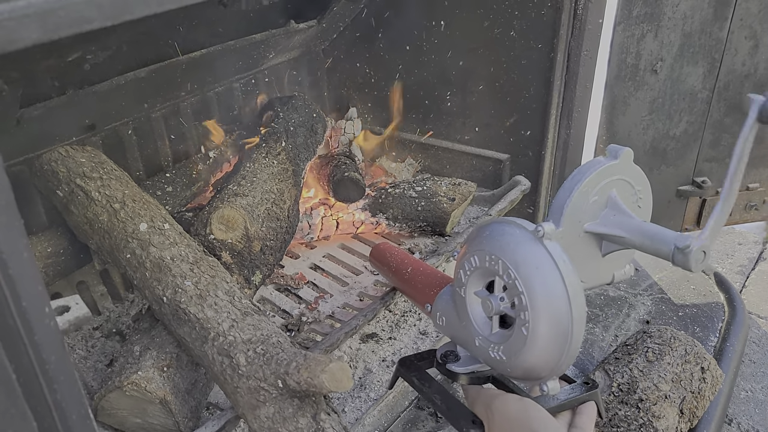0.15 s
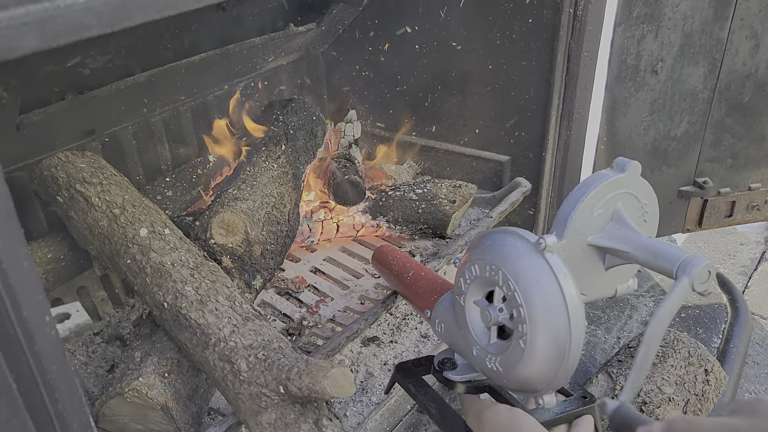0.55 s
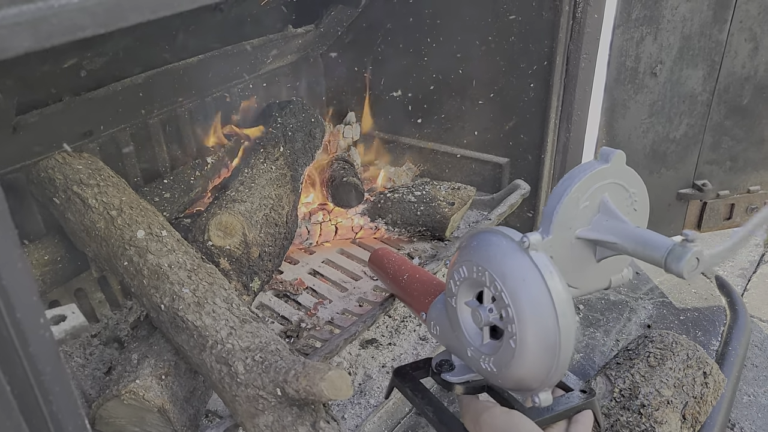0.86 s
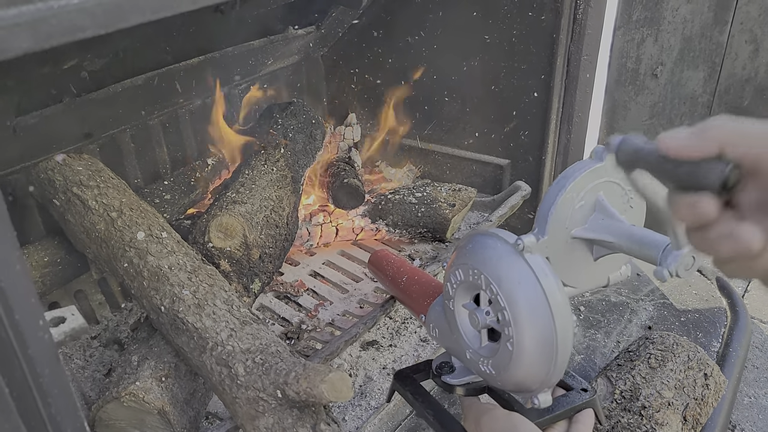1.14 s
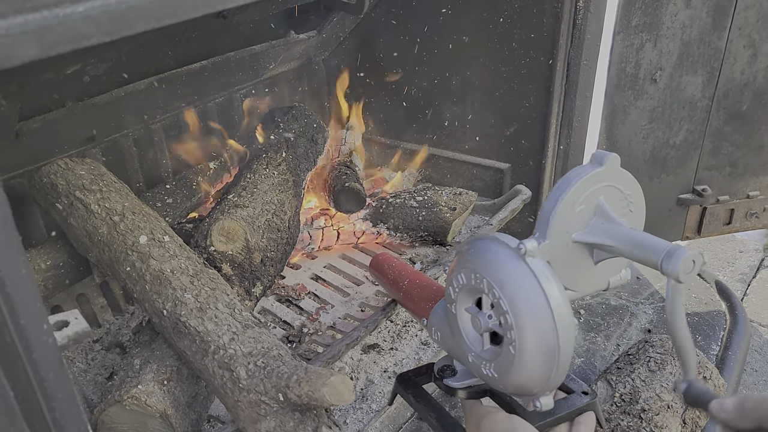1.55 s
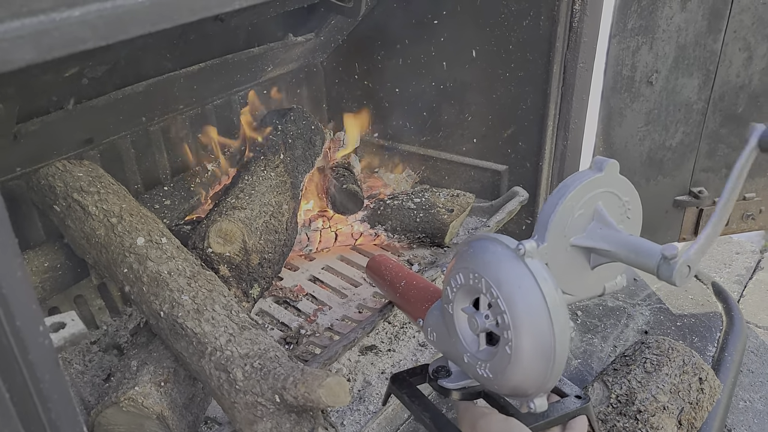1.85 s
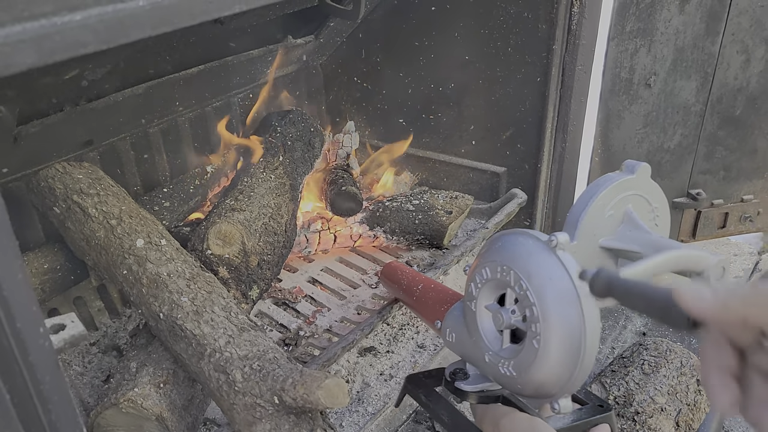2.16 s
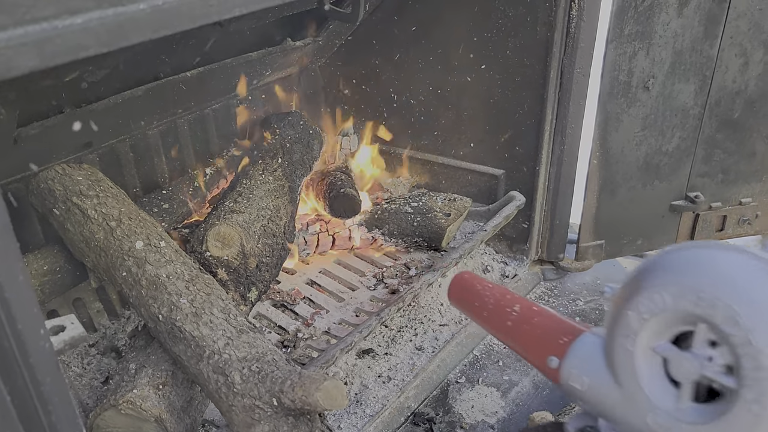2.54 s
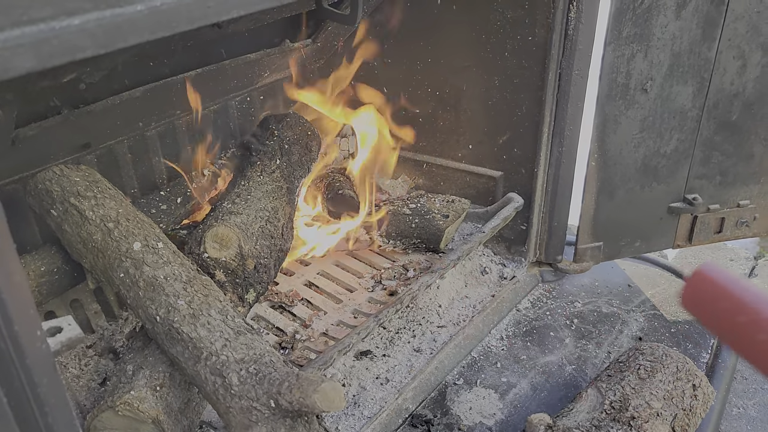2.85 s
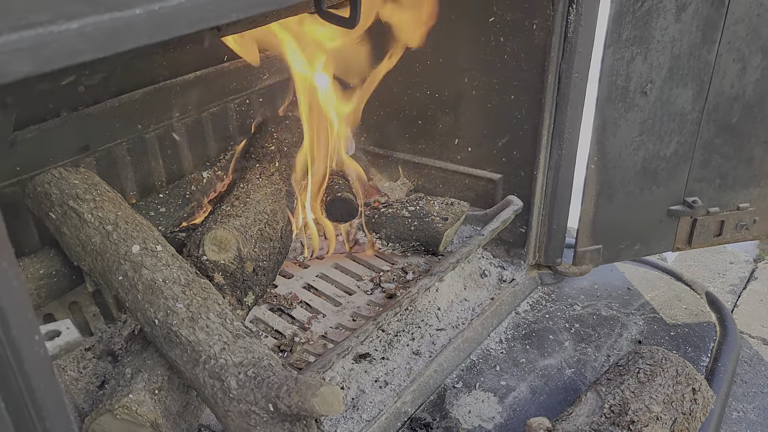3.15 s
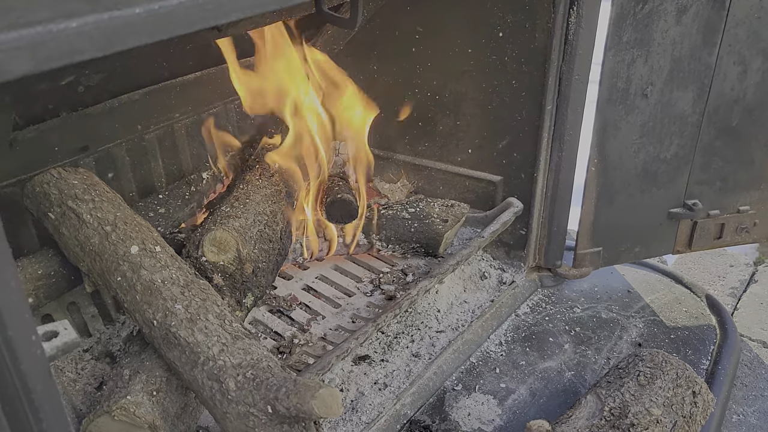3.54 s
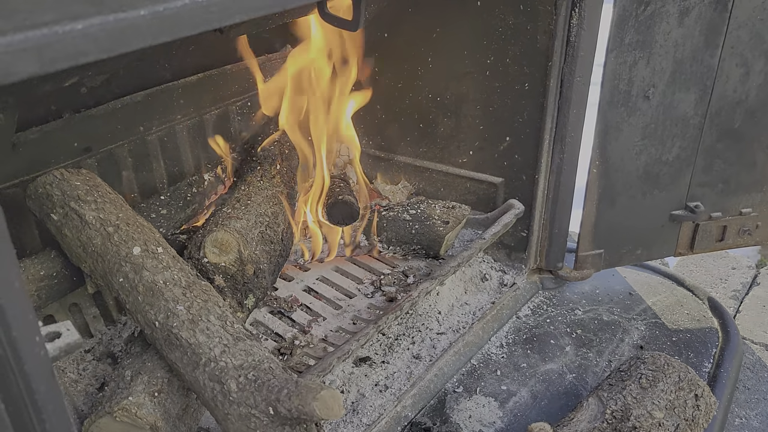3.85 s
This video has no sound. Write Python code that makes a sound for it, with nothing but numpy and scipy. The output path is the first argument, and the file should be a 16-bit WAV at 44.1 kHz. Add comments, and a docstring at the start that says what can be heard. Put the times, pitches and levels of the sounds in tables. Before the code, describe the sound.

A hand-cranked metal blower rattles from the start: quick, uneven knocks, ringing casing and gritty gear grinding, slightly to the right, over a deep fluttering fire roar and soft air hiss. Sharp bright clacks stand out around 2.2 s. From 2.3 s it is lifted away, thinner and weaker; the roar drops near 2.7 s, hiss briefly swells around 2.95 s. Rattling ends by 3.1 s, leaving faint low fire mutter and tiny ticks at 3.4 and 3.8 s.

```python
"""A fire roars under quick metal knocks and grinding, close to a two-port microphone.
A hand-cranked metal blower feeds a log fire in an iron firebox: its air jet makes the roar and a hiss,
its loose shaft knocks, with bright treble flares, and its gears grind through the casing.
The blower is lifted away to the right and runs down; the fire mutters on with a few ember ticks.
Air sounds are shaped noise; metal sounds are chattering clicks that ring casing modes and crack."""
import sys
import numpy as np
from scipy import signal
from scipy.fft import rfft, irfft
from scipy.io import wavfile
from scipy.ndimage import uniform_filter1d, map_coordinates

SR = 44100
rng = np.random.default_rng(int(sys.argv[2]) if len(sys.argv) > 2 else 0)


def convert_level_to_amplitude(level_db):
    """Map a level in decibels to its linear amplitude factor."""
    exponent = np.asarray(level_db, float) / 20
    return 10 ** exponent


def generate_wav(signal):
    """Clip the signal to [-1, 1] and save it as 16-bit WAV at the path in sys.argv[1]."""
    frames = np.transpose(np.atleast_2d(signal))
    scaled = np.clip(frames, -1, 1) * 32767
    pcm = np.round(scaled).astype(np.int16)
    wavfile.write(sys.argv[1], SR, pcm)


N = 176400  # samples, 4 s

# spectrum of the fire left alone, relative: pitch_hz, level_db (per Hz)
FIRE_SPECTRUM = [(25, -42), (60, -3.5), (92, 0.5), (154, -7.5), (200, -12.5), (270, -11.5), (430, -23),
                 (600, -31), (4400, -65), (6900, -69), (10000, -60), (15000, -42.5)]
# bass of the fire over time: time_s, level_db
FIRE_BASS = [(2.5, -33.5), (2.85, -51), (3.2, -47.5), (3.5, -50), (3.8, -45.5), (4, -49)]
FIRE_REST_DB = -65.5
# ticks of the embers: start_s, level_db (before the decay), pitch_hz
EMBER_TICKS = [(3.375, -43.5, 5900), (3.7913, -55, 5700), (3.8526, -49, 7040)]
TICK_DECAY_S, TICK_WIDTH_HZ = 0.005, 2600

# roar of the blown fire over time: time_s, level_db
ROAR_LEVEL = [(0, -26), (.3, -25.5), (.6, -26.5), (.9, -26), (1.2, -29), (1.45, -27), (1.7, -28.5),
              (1.95, -27.5), (2.3, -28.5), (2.5, -33.5), (2.6, -32.5), (2.68, -50), (2.85, -50), (3.2, -73)]
# spectrum of the roar, relative: pitch_hz, level_db (per Hz)
ROAR_SPECTRUM = [(25, -60), (55, -20), (90, -2), (126, 7.5), (160, -4), (185, -9), (215, 1.5), (280, -10),
                 (350, -2), (450, -11.5), (520, -13), (600, -22.5), (1200, -18), (3000, -77)]
# air hiss of the jet over time: time_s, level_db
JET_LEVEL = [(0, -50.5), (1.2, -53.5), (2.3, -50.5), (2.75, -44.5), (2.95, -42), (3.12, -45.5),
             (3.22, -51.5), (3.45, -56)]
# spectrum of the hiss, relative: pitch_hz, level_db (per Hz)
JET_SPECTRUM = [(500, -8), (2500, -9), (6000, -11), (7800, -12), (8600, -22.5), (11000, -9.5), (14000, -8)]
# left-right likeness of the air sounds: pitch_hz, likeness (1 = alike)
PORT_LIKENESS = [(60, .96), (250, 0.97), (600, 0.55), (1500, 0)]

# knocks of the loose shaft: peak_s, level_db (relative), low_share_db (extra below LOW_HZ)
SHAFT_KNOCKS = [(0.0712, -23, -0.5), (0.1058, -15.5, -6), (0.1343, -17, -4), (0.171, -11, -7),
                (0.2009, -16.5, -2), (0.2291, -15, -10), (.256, -21.5, -6.5), (0.2879, -25.5, -2),
                (0.3187, -21.5, -4.5), (0.3496, -21.5, -5), (0.3787, -13, -8), (0.408, -13, -10),
                (0.4404, -22, -1), (0.471, -23.5, 2), (0.5644, -30, 10), (0.5886, -26.5, 0.5),
                (0.6389, -23, -8), (0.7084, -28, -9), (0.7907, -18.5, -2), (0.823, -18, -2),
                (0.9164, -17.5, -6), (0.9517, -25, -1), (0.9719, -18, -4.5), (1.0211, -22, 0),
                (1.0515, -21, -7), (1.2461, -39, 16.5), (1.286, -16.5, -4.5), (1.3223, -37.5, 13.5),
                (1.4152, -27.5, 3.5), (1.4438, -29.5, 2), (1.5899, -55.5, 31), (1.6221, -22, 0),
                (1.6547, -42, 17), (1.686, -14.5, -3), (1.719, -27, 4), (1.7999, -31.5, 12.5),
                (1.8331, -18.5, -7), (1.8701, -16, -8), (1.9036, -13, -6.5), (1.9574, -20, -7),
                (1.9735, -31.5, 8.5), (2.0348, -20.5, -0.5), (2.0687, -21, -3), (2.1056, -23.5, -3),
                (2.174, -15.5, -10.5), (2.2119, -19, -22), (2.2677, -30, 4.5), (2.2997, -18.5, -7.5),
                (2.3129, -16, -16), (2.357, -29.5, 6.5), (2.3965, -27.5, -8), (2.4234, -29.5, -1),
                (2.4663, -51, -7), (2.5107, -21.5, -1.5), (2.5586, -22, -1), (2.61, -16.5, -5),
                (2.6584, -20, -1), (2.7127, -25, 6), (2.7639, -25, -0.5), (2.8275, -31, -2.5),
                (2.848, -42, 3), (2.8836, -38, 12), (2.9144, -33, -5), (2.9605, -46, 5.5),
                (2.9892, -44.5, -1), (3.0726, -54, 11)]
# modes of the casing: pitch_hz (middle), resting_level_db, lifted_level_db (relative), t60_s
CASING_MODES = [(655, -3.5, -39, 0.052), (770, -19, 6, 0.033), (1032.5, 1.5, -1, 0.045),
                (1286.5, 1.5, -0.5, 0.031), (1463.6, -6.5, 10.5, 0.043), (1655, -9, -1, 0.021),
                (2002, -7, 3, 0.024), (2197, -1.5, -6, 0.029), (2536, -4, -21.5, 0.03),
                (3480, -9.5, -9.5, 0.041), (3767, -6.5, -6, 0.027), (4258, -28, -10, 0.036),
                (4440, -29.5, -9, 0.013), (5902, -13.5, -11, 0.008), (6580, -17, -17, 0.021),
                (7510, -16, -24, 0.0065)]
# wide-band crack of the metal, relative: pitch_hz, level_db
CRACK_SPECTRUM = [(300, -27), (500, 3), (800, -10.5), (1500, 4.5), (2700, 4.5), (3700, -6), (4900, -9),
                  (7600, -11), (8200, -24.5), (9700, -13.5), (11000, -20), (13000, -13), (16500, -22)]
# grind of the gears: time_s, load_db (relative), brightness_db (extra above LOW_HZ)
GEAR_LOAD = [(0, -33.5, -6), (.22, -36, 1.5), (.33, -39, 1.5), (.45, -35, 1.5), (.7, -38, -7),
             (.97, -35, -1), (1.18, -38, -5), (1.45, -37.5, -5.5), (1.7, -38.5, -5), (1.88, -31, 0),
             (2.0, -41.5, -2.5), (2.25, -39, 2), (2.45, -41.5, 1.5), (2.7, -52.5, 3), (2.9, -62, -14),
             (3.08, -71, -8), (3.25, -100, -4)]
# bright treble flares of the knocks: peak_s, level_db (relative), lowest_hz
KNOCK_FLARES = [(.135, -19, 9500), (.464, -21, 11000), (.639, -14.5, 10800), (1.577, -51, 11000),
                (2.177, -9, 5640), (2.213, -8.5, 5200), (2.214, -12, 11900), (2.314, -17, 5960)]

LOW_HZ = 2400  # parts the low metal sounds from the high ones
HOLLOW_HZ = 900  # modes below this change only once the inlet turns away
LIFT_START_S, TURN_START_S, MOVE_TAKES_S = 2.26, 2.5, 0.16
RING_DB, CRACK_DB, LOW_CRACK_DB = 0.5, -1.5, 5
LIFTED_CRACK_DB = -20  # off the ground the low crack thins
GRIND_RING_DB, GRIND_CRACK_DB = 1, -1
LIFTED_GRIND_RING_DB = 3  # held free, the casing sings more with the gears
MODE_WAVER = 0.35  # each knock shifts a mode by about this share of its width
LEAD_S = 0.0022  # a chatter starts a little before its peak
CHATTER_PER_S, SCATTER_DB = 4000, 2.5
CHATTER_RISE_S, CHATTER_FALL_S, FLARE_FALL_S = 0.0021, 0.0052, 0.0043
FLARE_SPAN = 1.55  # upper edge of a flare's band over its lower edge
GRIND_PER_S, GRIT_DB = 2500, 3.5
CLUMP_DB, CLUMP_S = 3.2, 0.008

# place of the blower: time_s, left_lag_samples, left_over_right_db, left_phase_lag_rad
BEARING_PATH = [(0, 7.1, 0, 0.28), (2.2, 7.84, -0.5, 0.43), (2.35, 7.45, -2, 0.34), (2.75, 13, -3, 0.52),
                (4, 42, -9, 0.37)]
WALL_DELAY_S, WALL_T60_S, WALL_DB = 0.0022, 0.052, -7.5
# tilt between the microphone ports: pitch_hz, left_over_right_db
PORT_TILT = [(30, 0), (125, 0), (250, -3), (1000, 0), (6000, -1), (15000, -6)]
# colour of the microphone: pitch_hz, level_db
MIC_RESPONSE = [(9000, -3), (11000, -15), (14000, -12.5), (15300, -10), (15900, -15), (16500, -50)]


def evened(x):
    """Scales a sound to unit rms."""
    return x / np.sqrt(np.mean(x ** 2) + 1e-20)


def read(points, hz):
    """Reads a spectrum table at the given pitches, on a log pitch scale."""
    f, value = np.transpose(points)
    return np.interp(np.log(hz + 1), np.log(f + 1), value)


def along(rows, index=1):
    """Draws one column of a time table as a curve over the whole scene."""
    return np.interp(np.arange(N) / SR, [r[0] for r in rows], [r[index] for r in rows])


def colour(x, points):
    """Causal (minimum-phase) filter of unit energy with the given spectrum."""
    level_db = np.maximum(read(points, abs(np.fft.fftfreq(2048, 1 / SR))), -100)
    log_gain = np.log(convert_level_to_amplitude(level_db))
    taps = np.fft.ifft(np.exp(np.conj(signal.hilbert(log_gain)))).real[:1024]
    taps = taps / np.linalg.norm(taps)
    taps = np.broadcast_to(taps, (1,) * (x.ndim - 1) + taps.shape)
    return signal.oaconvolve(x, taps, axes=-1)[..., :N]


def air(spectrum, size, patchy_db, gusty_db):
    """Random short-time spectra with drifting patches and shared flutter, partly alike at both ports."""
    hop = size // 4
    frames, hz = N // hop + 5, np.fft.rfftfreq(size, 1 / SR)
    a, b, c, d, patches = rng.standard_normal((frames, len(hz), 5)).T
    patches = uniform_filter1d(uniform_filter1d(patches, size=9, axis=0), size=9, axis=1)
    gusts = evened(uniform_filter1d(rng.standard_normal(frames), size=3))
    same = np.clip(read(PORT_LIKENESS, hz), -1, 1)[:, None]
    left = a + 1j * b
    right = same * left + np.sqrt(1 - same ** 2) * (c + 1j * d)
    level_db = read(spectrum, hz)[:, None] + patchy_db * evened(patches) + gusty_db * gusts
    z = np.array([left, right]) * convert_level_to_amplitude(level_db)
    return signal.istft(z, nperseg=size, noverlap=size - hop)[1][:, :N]


def muttering_fire():
    """Noise of the burning logs: its bass swells and sinks, the rest keeps one average level."""
    fire = air(FIRE_SPECTRUM, size=2048, patchy_db=1.2, gusty_db=0.6)
    bass = signal.sosfiltfilt(signal.butter(2, 450, fs=SR, output="sos"), fire)
    return convert_level_to_amplitude(along(FIRE_BASS)) * evened(bass) + convert_level_to_amplitude(FIRE_REST_DB) * evened(fire - bass)


def embers():
    """Short noisy ticks with a wide resonance: slow noise carried on a decaying tone."""
    out, t = np.zeros((2, N)), np.arange(1200) / SR
    r = np.exp(-np.pi * TICK_WIDTH_HZ / SR)
    for start_s, level_db, pitch_hz in EMBER_TICKS:
        slow = signal.lfilter([1], [1, -2 * r, r * r], rng.standard_normal((2, len(t))))
        tick = evened(slow) * np.sin(2 * np.pi * pitch_hz * t) * np.exp(-t / TICK_DECAY_S)
        at = round(start_s * SR)
        out[:, at:at + len(t)] += convert_level_to_amplitude(level_db) * tick
    return out


def blown_roar():
    """Deep turbulent noise of the fire under the air jet."""
    return convert_level_to_amplitude(along(ROAR_LEVEL)) * evened(air(ROAR_SPECTRUM, size=2048, patchy_db=1.5, gusty_db=0.8))


def jet_hiss():
    """Treble turbulence of the air jet, in shorter frames than the roar."""
    return convert_level_to_amplitude(along(JET_LEVEL)) * evened(air(JET_SPECTRUM, size=512, patchy_db=1.2, gusty_db=1.2))


def signs():
    """A random sign for each sample, so that one grit can drive parts independently."""
    return rng.choice([-1., 1.], N)


def grit(shape, per_s, spread_db):
    """Sparse clicks of random sign, a few large."""
    hit = (rng.random(shape) < per_s / SR) * rng.choice([-1., 1.], shape)
    return evened(hit * convert_level_to_amplitude(spread_db * np.minimum(rng.exponential(1, shape), 4)))


def bursts(start_s, fall_s):
    """One chatter of impacts for each start; returns a player that takes levels and optional pitches."""
    t = np.arange(1500) / SR
    shape = (1 - np.exp(-t / CHATTER_RISE_S)) * np.exp(-t / fall_s)
    energy = np.linalg.norm(shape)
    chatter = grit((len(start_s), len(t)), CHATTER_PER_S, SCATTER_DB) * shape
    chatter *= energy / np.linalg.norm(chatter, axis=1, keepdims=True)
    at = np.round(start_s[:, None] * SR).astype(int) + np.arange(len(t))

    def play(level_db, hz=None):
        """Lays out the chatters, evening out their strength at the given pitches."""
        luck = 1
        if hz is not None:
            at_pitch = (chatter * np.exp(2j * np.pi * hz[:, None] * t)).sum(axis=1)
            luck = np.clip(abs(at_pitch) / energy, 0.5, 3)
        played = chatter * (convert_level_to_amplitude(level_db) / luck)[:, None]
        return np.bincount(at.ravel(), played.ravel(), N + len(t))[:N]
    return play


def moved(start_s):
    """Ramp from 0 to 1 as the blower is moved."""
    return np.clip((np.arange(N) / SR - start_s) / MOVE_TAKES_S, 0, 1)


def knock_flares():
    """Bright treble flares of the knocks: short chatters, each in a band above its own edge."""
    out = np.zeros(N)
    for peak_s, level_db, lowest_hz in KNOCK_FLARES:
        band = signal.butter(3, [lowest_hz, FLARE_SPAN * lowest_hz], "band", fs=SR, output="sos")
        chatter = bursts(np.array([peak_s - LEAD_S]), FLARE_FALL_S)
        out += signal.sosfilt(band, chatter(np.array([level_db])))
    return out


def gear_grit():
    """Grit of the gear teeth, coming in clumps and following the load."""
    clumps = evened(uniform_filter1d(rng.standard_normal(N), size=round(CLUMP_S * SR)))
    teeth = grit(N, GRIND_PER_S, GRIT_DB) * convert_level_to_amplitude(CLUMP_DB * np.minimum(clumps, 2))
    return evened(teeth) * convert_level_to_amplitude(along(GEAR_LOAD))


def casing_ring(gears):
    """Knocks and gear grit drive decaying resonances, whose pitch shifts a little at each knock."""
    peak_s, level_db, low_db = np.transpose(SHAFT_KNOCKS)
    start_s = peak_s - LEAD_S
    trains = [bursts(start_s, CHATTER_FALL_S) for _ in range(2)]
    scatter, shift = rng.standard_normal((len(start_s), len(CASING_MODES), 2)).T
    latest = np.maximum(np.searchsorted(start_s, np.arange(N) / SR) - 1, 0)  # knock now sounding
    bright, lifted, turned = convert_level_to_amplitude(along(GEAR_LOAD, index=2)), moved(LIFT_START_S), moved(TURN_START_S)
    grind_gain = convert_level_to_amplitude(GRIND_RING_DB + LIFTED_GRIND_RING_DB * lifted)
    ring = np.zeros(N)
    for k, (hz, rest_db, lift_db, t60_s) in enumerate(CASING_MODES):
        is_low = hz < LOW_HZ
        fade = np.log(1000) / t60_s
        struck_hz = hz + MODE_WAVER * shift[k] * fade / np.pi
        knock_db = level_db + RING_DB + SCATTER_DB * scatter[k] + low_db * is_low
        drive = trains[k % 2](knock_db, struck_hz)
        drive = drive + grind_gain * gears * signs() * (1 if is_low else bright)
        # resonate around zero pitch, then turn back up to the mode's moving pitch
        turn = np.exp(2j * np.pi * np.cumsum(struck_hz[latest]) / SR)
        r = np.exp(-fade / SR)
        mode = (turn * signal.lfilter([np.sqrt(1 - r)], [1, -r], drive / turn + 1e-18)).imag
        change = turned if hz < HOLLOW_HZ else lifted
        ring += mode * convert_level_to_amplitude(rest_db + (lift_db - rest_db) * change)
    # keeps the ring above the bass
    return signal.sosfilt(signal.butter(3, HOLLOW_HZ / 2, "high", fs=SR, output="sos"), ring)


def metal_crack(gears):
    """Wide-band crack of knocks and gears, with its own chatter at each port."""
    peak_s, level_db, low_db = np.transpose(SHAFT_KNOCKS)
    low, high = (signal.butter(3, LOW_HZ, kind, fs=SR, output="sos") for kind in ("low", "high"))
    bright, thinned = convert_level_to_amplitude(along(GEAR_LOAD, index=2)), convert_level_to_amplitude(LIFTED_CRACK_DB * moved(LIFT_START_S))
    ports = []
    for _ in range(2):
        train = bursts(peak_s - LEAD_S, CHATTER_FALL_S)
        grind = convert_level_to_amplitude(GRIND_CRACK_DB - CRACK_DB) * gears * signs()
        low_crack = (train(level_db + low_db + LOW_CRACK_DB) + grind) * thinned
        high_crack = train(level_db) + grind * bright
        ports.append(signal.sosfilt(low, low_crack) + signal.sosfilt(high, high_crack))
    return convert_level_to_amplitude(CRACK_DB) * colour(np.array(ports), CRACK_SPECTRUM)


def blower():
    """Shaft and gears ring the casing and crack in a wide band; some knocks flare in the treble."""
    gears = gear_grit()
    flares = np.array([knock_flares(), knock_flares()])
    return casing_ring(gears) + metal_crack(gears) + flares


def placed(x):
    """Sets the blower to the right: the left port lags and grows softer; iron walls answer densely."""
    half_gain = convert_level_to_amplitude(along(BEARING_PATH, index=2) / 2)
    turned = (signal.hilbert(x[0]) * np.exp(-1j * along(BEARING_PATH, index=3))).real
    left = map_coordinates(turned, [np.arange(N) - along(BEARING_PATH)], order=3) * half_gain
    direct = np.array([left, x[1] / half_gain])
    t = np.arange(6000) / SR
    tail = grit((2, len(t)), 2500, 2.6) * convert_level_to_amplitude(-60 * t / WALL_T60_S) * (t > WALL_DELAY_S)
    echo = signal.fftconvolve(direct, tail / np.linalg.norm(tail[0]), axes=1)[:, :N]
    return direct + convert_level_to_amplitude(WALL_DB) * echo


def scene():
    """The fire and its embers, the roar and hiss of the jet, and the blower close by."""
    return muttering_fire() + embers() + blown_roar() + jet_hiss() + placed(blower())


def top_cut(x):
    """Nothing passes above the cut-off."""
    return signal.sosfilt(signal.butter(12, 16660, fs=SR, output="sos"), x)


def record(dry):
    """Two-port microphone: one colour for both ports and an opposite tilt at each."""
    hz = np.fft.rfftfreq(N, 1 / SR)
    tilt = convert_level_to_amplitude(read(PORT_TILT, hz) / 2)
    response = np.array([tilt, 1 / tilt]) * convert_level_to_amplitude(read(MIC_RESPONSE, hz))
    mix = irfft(rfft(dry) * response, N)
    return top_cut(mix)


dry = scene()
out = record(dry)
generate_wav(out)
```